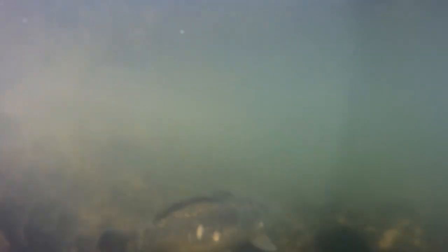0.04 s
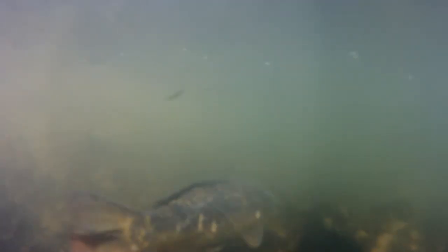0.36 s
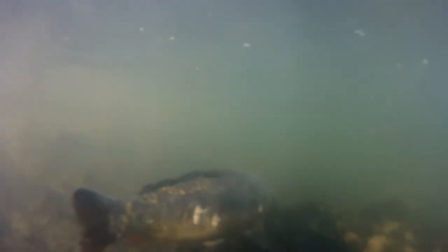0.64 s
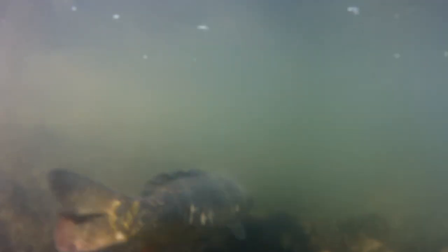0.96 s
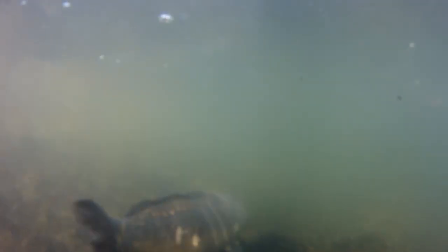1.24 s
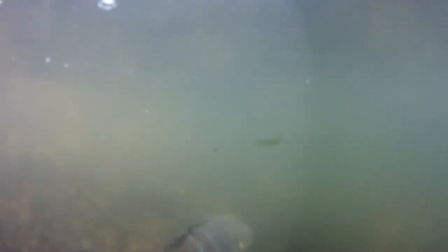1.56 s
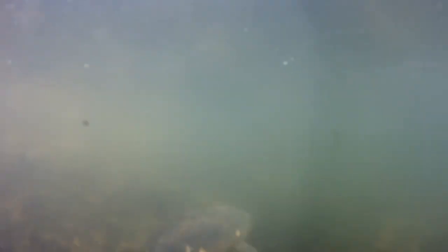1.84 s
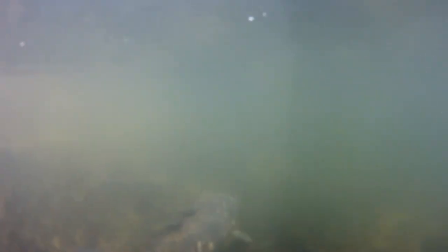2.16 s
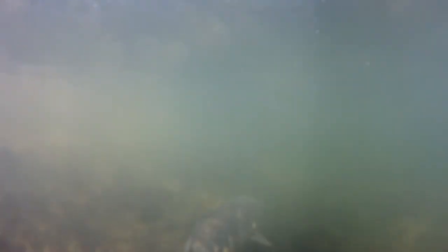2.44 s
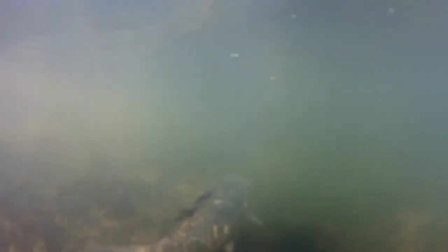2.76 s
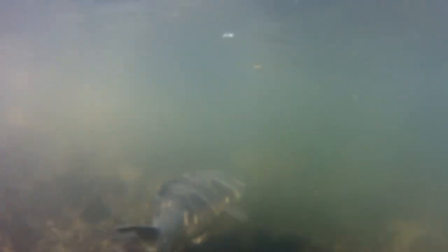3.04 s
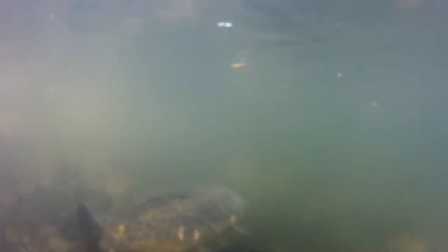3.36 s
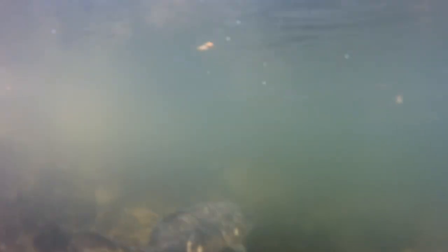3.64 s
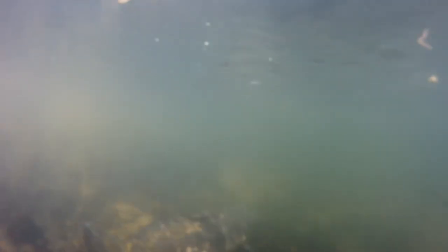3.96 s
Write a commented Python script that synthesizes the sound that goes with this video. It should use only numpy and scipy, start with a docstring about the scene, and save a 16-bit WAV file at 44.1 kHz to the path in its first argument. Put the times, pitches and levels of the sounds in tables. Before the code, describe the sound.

Muffled river water rumbles around a submerged camera, with handling bumps and little bubbles.

```python
"""A deep, swaying rumble of river water presses on a submerged camera in a waterproof housing,
under the steady hiss and thin whine of its electronics. The grip rubs and scuffs the housing,
which rings briefly, and gives it dull bumps. Bubbles pinch off nearby and ring as short plips,
grit ticks on the shell and tiny bubbles fizz. One hard, hollow knock stands out early on."""
import sys
import numpy as np
from scipy import signal
from scipy.fft import rfft, irfft
from scipy.io import wavfile

SR = 44100
rng = np.random.default_rng(int(sys.argv[2]) if len(sys.argv) > 2 else 0)


def master(y):
    """Save y as 16-bit WAV."""
    cut = np.clip(np.atleast_2d(y).T, -1, 1)
    pcm = np.round(cut * 32767)  # scale
    wavfile.write(sys.argv[1], SR, pcm.astype(np.int16))


N = 176400
TIME = np.arange(N) / SR
TREBLE_FROM_HZ = 1200  # divides the housing's low modes from its upper ones
HOUSING_PAN_DB = -3.5


def from_db(db):
    """Decibels to gain."""
    return 10 ** (np.asarray(db) / 20)


def unit_rms(x):
    """Scale to an rms of one."""
    return x / np.sqrt(np.mean(x ** 2) + 1e-20)


def fader(curve):
    """Gain over time from (t/s, level/dB) points."""
    return from_db(np.interp(TIME, *np.transpose(curve)))


def pan(db):
    """Left and right gains averaging one; db is left minus right."""
    gains = from_db([[db / 2], [-db / 2]])
    return gains / gains.mean()


def butterworth(x, order, hz, kind="low"):
    """Low-pass or band-pass with a smooth passband."""
    return signal.sosfilt(signal.butter(order, hz, kind, fs=SR, output="sos"), x + 1e-18)


def resonate(x, hz, width_hz):
    """One resonance with a gain of about one at its peak."""
    r = np.exp(-np.pi * width_hz / SR)
    return signal.lfilter([1 - r, 0, r - 1], [1, -2 * r * np.cos(2 * np.pi * hz / SR), r * r], x + 1e-18)


def noise(spectrum):
    """Unit-rms noise coloured by (f/Hz, level/dB) points, rolled off below the first."""
    hz, db = np.transpose(spectrum)
    f = np.maximum(np.arange(N // 2 + 1) * SR / N, 1e-3)
    gain = from_db(np.interp(np.log(f), np.log(hz), db)) * np.minimum(f / hz[0], 1) ** 2
    return unit_rms(irfft(rfft(rng.standard_normal(N)) * gain, N))


def stereo_noise(spectrum, side_db):
    """Centred noise, widened by a quieter side signal."""
    return noise(spectrum) + from_db(side_db) * noise(spectrum) * [[1], [-1]]


def clicks(per_s, spread_db):
    """Random clicks of uneven size."""
    sizes = from_db(spread_db * np.minimum(rng.exponential(1, N), 4)) * rng.choice([-1, 1], N)
    return sizes * (rng.random(N) < per_s / SR)


def add(out, start_s, sound):
    """Mix a sound in at its cue."""
    i = int(np.clip(start_s * SR, 0, N - 1))
    out[i:i + len(sound)] += sound[:N - i]


def water():
    """Swaying water: slow swells of pressure, and above them a rumble that comes in small surges."""
    # strength of the sway: t/s, level/dB
    sway = [(0,-36),(.4,-43.5),(.6,-47),(.85,-42.5),(1.2,-41.5),(1.6,-43.5),(1.8,-43),(2.1,-40.5),(2.45,-39.5),(2.7,-44),(3.1,-47),(3.4,-42.5),(3.65,-47.5),(4,-45)]
    # colours of the rumble and of the swells: f/Hz, level/dB
    rumble_colour = [(10,-6),(20,-5.5),(30,-4.5),(42,-11),(70,-16),(120,-21),(250,-32.5),(600,-38.5),(2000,-60)]
    swell_colour = [(7,-7),(14,-1.5),(28,-18.5),(120,-37),(2000,-100)]
    surge_db, surge_hz = 3, 7.7
    surges = from_db(surge_db * noise([(1, 0), (surge_hz, 0), (60, -40), (2000, -120)]))
    rumble = from_db(-7) * unit_rms(surges * stereo_noise(rumble_colour, side_db=-45))
    swells = from_db(-2.5) * noise(swell_colour)
    return fader(sway) * (pan(-10.5) * swells + pan(-4.5) * rumble)


def electronics():
    """The camera's circuits lay down a steady hiss and a thin whine."""
    # colour of the hiss: f/Hz, level/dB
    hiss_colour = [(100,14.5),(800,-10.5),(1200,3),(1900,0.5),(2500,1.5),(3000,1),(4000,1),(8000,1),(12000,1.5),(15000,1.5)]
    # tones of the whine: f/Hz, level/dB
    tones = [(6575,-79),(12200,-83),(13100,-80),(13150,-60),(13200,-79)]
    hiss = from_db(-60) * stereo_noise(hiss_colour, side_db=-11)
    whine = sum(np.sqrt(2) * from_db(db - 1) * np.sin(2 * np.pi * hz * TIME) for hz, db in tones)
    return pan(-1.5) * hiss + pan(HOUSING_PAN_DB) * whine


def housing(low_force, treble_force):
    """The shell rings: a softened force drives its low modes, a sharp one the upper."""
    # resonances of the housing: f/Hz, width/Hz, level/dB
    modes = [(230,97,-7),(461,237,-2),(643,224,1.5),(772.6,91,6),(1432,97,-5.5),(1890,258,-0.5),(2946,220,2),(4180,140,-15),(4900,300,-19.5)]
    soft_force = butterworth(low_force, 4, hz=926)
    out = 0
    for hz, width, db in modes:
        ring = resonate(treble_force if hz > TREBLE_FROM_HZ else soft_force, hz, width)
        out += from_db(db) * resonate(ring, hz, 2.5 * width)  # darkens the valleys between modes
    return out


def rubbing():
    """The shifting grip: dense slips ring the housing, and sparser soft thuds press on it."""
    # how hard the grip rubs: t/s, level/dB
    effort = [(0,-57),(.03,-69),(.05,-46),(.21,-47),(.275,-55),(.295,-47),(.46,-46),(.51,-56.5),(.68,-52.5),(1.04,-63),(1.12,-61),(1.33,-63.5),(1.39,-44.5),(1.47,-61.5),(1.62,-55),(1.78,-54),(1.86,-67.5),(1.95,-49),(2.02,-61.5),(2.39,-66.5),(2.42,-49),(2.49,-58),(2.55,-50),(2.64,-62.5),(2.79,-57),(2.95,-62.5),(3.6,-64),(3.81,-53),(3.89,-57.5),(3.91,-47.5),(3.97,-40),(4,-36.5)]
    treble_db, thud_low_hz, thud_top_hz = -6.5, 82.4, 502
    slips = clicks(per_s=900, spread_db=4.5)
    ringing = unit_rms(housing(slips, slips * from_db(treble_db)))
    presses = butterworth(clicks(per_s=300, spread_db=4.5), 5, thud_top_hz)
    thuds = unit_rms(butterworth(presses, 1, [thud_low_hz, thud_top_hz], "band"))
    return fader(effort) * (from_db(-7) * ringing + from_db(-4) * thuds)


def bumps():
    """Dull, heavily damped pushes on the housing, each one swing of pressure down and up."""
    # soft contacts of the grip: t/s, level/dB, f/Hz
    contacts = [(.036,-36.5,215),(.056,-28.5,324),(0.106,-34.5,186),(0.1139,-25.5,335),(0.127,-43,69),(0.1604,-32.5,400),(0.174,-46,130),(0.188,-36,149),(0.215,-37.5,80),(0.267,-39.5,75),(0.2024,-47,220),(0.2081,-40,220),(0.2864,-27.5,280),(.292,-36,333),(0.304,-38,430),(0.334,-36,220),(0.373,-42,192),(0.4038,-44,300),(.4665,-39,344),(0.5403,-39.5,230),(0.703,-42,230),(0.707,-44,257),(.9355,-44,296),(1.0268,-41.5,278),(1.204,-49,300),(1.352,-39,237),(1.374,-32,236),(1.3811,-36,230),(1.3975,-41,262),(1.426,-41,260),(1.6537,-43.5,250),(1.7196,-41,257),(1.7517,-41,253),(1.7921,-39.5,252),(1.936,-39,85.5),(1.947,-51,125),(2.4187,-40.5,158),(2.4251,-33,200),(2.4322,-37,140),(2.5224,-35,230),(2.771,-39.5,326),(3.6906,-37.5,334),(3.967,-32,380),(3.984,-28.5,300)]
    out, t = np.zeros(N), TIME[:SR // 25] - 1 / 50  # 40 ms centred on the contact
    for s, db, hz in contacts:
        phase = 2 * np.pi * hz * t
        push = phase * np.exp((1 - phase ** 2) / 2)
        add(out, s + t[0], from_db(db) * push)
    return out


def bubbles():
    """Each bubble pinches off with a tiny splash, then rings as a dying sine that rises in pitch."""
    # single bubbles: t/s, f/Hz, level/dB, t60/s
    plips = [(.041,770,-31.5,0.064),(.0745,730,-34.5,0.045),(0.3792,2870,-36,0.019),(.424,4740,-41.5,.015),(0.425,8160,-49,0.0066),(.256,770,-39,0.025),(.298,820,-40,0.095),(0.521,2240,-49.5,0.039),(.631,752,-43.5,0.19),(.636,1730,-45,.07),(0.649,1762,-45,0.055),(0.715,1465,-48,0.074),(.723,3054,-29.5,0.024),(0.736,5200,-42,0.017),(.833,4370,-39.5,0.018),(.834,4900,-42,0.0085),(0.8524,3980,-30.5,0.015),(0.8834,3000,-36.5,0.019),(.955,7250,-45.5,0.011),(0.9547,4800,-47.5,.012),(1.169,745,-35,0.049),(1.191,5420,-44,.018),(1.193,1890,-52,0.057),(1.197,3040,-47,0.032),(1.245,4740,-40,0.011),(1.272,2970,-41.5,0.021),(1.285,3140,-50,0.048),(1.30,770,-51.5,0.14),(1.34,2500,-48,0.042),(1.9445,2990,-26,0.018),(2.058,2080,-45,0.019),(2.223,2040,-46,.02),(2.286,3020,-48,0.026),(2.404,4900,-46,.012),(3.031,2950,-35.5,0.0093),(3.108,5130,-39,0.01),(3.139,983,-46,0.045),(3.168,2800,-45,0.024),(3.171,3760,-42.5,0.02),(3.177,4500,-45,0.013),(3.325,2250,-51,0.051),(3.395,2170,-52,0.046),(3.428,3200,-50.5,0.036),(3.457,1864,-44,0.031),(3.468,2900,-48.5,0.035),(3.511,4600,-48.5,.02),(3.523,3100,-44.5,0.03),(3.557,2890,-45.5,.025),(3.583,940,-38,0.048),(3.733,4030,-41.5,0.015),(3.899,693,-30.5,0.034),(3.931,680,-35.5,0.062)]
    attack_cycles, rise_per_s = 3.25, 1.1
    splash_db, splash_s = -15.5, 0.0017
    out, t = np.zeros(N), TIME[:SR // 10]
    splash_envelope = t / splash_s * np.exp(1 - t / splash_s) / 2
    for s, hz, db, t60 in plips:
        attack = 1 - np.exp(-(t * hz / attack_cycles) ** 2)
        phase = 2 * np.pi * hz * (t + rise_per_s * t * t / 2)
        ring = attack * from_db(-60 * t / t60) * np.sin(phase)
        splash = splash_envelope * unit_rms(resonate(rng.standard_normal(len(t)), hz, hz / 2))
        add(out, s, from_db(db + 1) * (ring + from_db(splash_db) * splash))
    return out


def scuffs():
    """Tiny slips swell and fade within milliseconds around one firm catch, and ring the housing."""
    # short scuffs of the grip: t/s, level/dB, half length/s, treble/dB
    strokes = [(0.0577,-36,0.001,1),(0.1151,-35,.0025,1),(0.157,-51,0.0085,6.5),(0.1622,-40,0.0019,4.5),(0.186,-54.5,0.0046,6),(.2055,-43,0.0015,-3),(0.281,-61,.005,14),(0.2852,-33,.0015,-2),(0.2926,-37,0.0019,-4),(0.332,-39.5,0.0014,-3.5),(0.413,-43,0.0024,-4.5),(.4365,-42,0.0039,-7),(0.7,-43.5,0.0012,3),(.709,-49,0.0018,7),(.715,-45,0.0022,0),(0.937,-43.5,0.0011,-9),(1.204,-47,0.0015,-12),(1.76,-57,0.0054,2.5),(1.784,-60,0.0052,5),(1.869,-58.5,.001,16.5),(1.893,-64.5,0.0028,17.5),(1.944,-39,0.0032,-5.5),(2.773,-44.5,.002,0.5),(3.91,-57,.002,-2),(3.953,-45,0.0044,-8),(3.966,-46,0.0035,-11),(3.971,-50.5,0.0036,-1),(3.982,-44.5,0.0039,-4.5),(3.997,-46,0.0019,3)]
    grain_db, catch_db = -2, -1.5
    grain = rng.choice([-1., 1.], N)
    low_force, treble_force = np.zeros(N), np.zeros(N)
    for s, db, half_s, treble_db in strokes:
        envelope = np.exp(-np.minimum(((TIME - s) / half_s) ** 2, 50))
        force = from_db(grain_db) * grain * envelope
        catch = from_db(catch_db) * np.sqrt(half_s * SR)
        add(force, s - half_s / 2, [catch])
        low_force += from_db(db) * force
        treble_force += from_db(db + treble_db) * force
    return housing(low_force, treble_force) / np.std(housing(grain, grain))


def ticks():
    """Grit strikes the housing in faint, thin cracks of noise."""
    # hits of grit: t/s, level/dB
    hits = [(0.116,-36),(0.16,-48),(.2862,-37),(0.33,-43.5),(0.4238,-34.5),(0.703,-43),(1.944,-41),(2.063,-44),(2.451,-46.5)]
    rise_s, band_hz = 0.0018, [3500, 14700]
    out, t = np.zeros(N), TIME[:SR // 20]
    envelope = t / rise_s * np.exp(1 - t / rise_s) / 2
    for s, db in hits:
        add(out, s - rise_s, from_db(db) * envelope * rng.standard_normal(len(t)))
    return butterworth(out, 1, band_hz, "band")


def fizz():
    """Many tiny bubbles ring at random moments and pitches."""
    # strength of the fizz: t/s, level/dB
    strength = [(0,-75),(.3,-76),(.43,-53.5),(.5,-68),(.72,-67),(.8,-66.5),(1.15,-64),(1.27,-58),(1.4,-63),(1.5,-77),(1.85,-63.5),(2.6,-72),(2.98,-69),(3.15,-60),(3.3,-66.5),(3.5,-65.5),(3.65,-73),(4,-65.5)]
    # colour of the fizz: f/Hz, level/dB
    colour = [(700,-7.5),(1100,-7),(1750,-0.5),(2500,1),(3100,4),(4000,-3.5),(5500,1)]
    pitches_hz, t60_cycles = np.geomspace(700, 5600, 36), 80
    births = clicks(per_s=800, spread_db=5)
    pitch_index = rng.integers(0, len(pitches_hz), N)
    out = 0
    for k, hz in enumerate(pitches_hz):
        width = np.log(1000) / np.pi * hz / t60_cycles
        gain = from_db(np.interp(hz, *np.transpose(colour))) / width
        out += gain * resonate(births * (pitch_index == k), hz, width)
    return fader(strength) * unit_rms(out)


def knock():
    """One hard tap on the housing, with a short, hollow ring."""
    # modes the tap excites: f/Hz, level/dB, t60/s
    modes = [(673,-28.5,0.028),(745,-59,.022),(1280,-60,0.024),(1730,-54,0.019),(1920,-23,0.029),(2170,-31.5,0.022)]
    start_s = .6043
    out, t = np.zeros(N), TIME[:SR // 10]
    for hz, db, t60 in modes:
        polarity = -1 if hz < TREBLE_FROM_HZ else 1
        add(out, start_s, polarity * from_db(db - 60 * t / t60) * np.sin(2 * np.pi * hz * t))
    return butterworth(out, 4, hz=2700)


def scene():
    """Close handling and bubbles over a bed of water and electronics, all leaning to the right."""
    near = bumps() + scuffs() + rubbing() + knock() + ticks() + bubbles() + fizz()
    return water() + pan(HOUSING_PAN_DB) * near + electronics()


def record(dry):
    """A steep low-pass shaves off the highest treble."""
    cutoff_hz = 15350
    return signal.sosfilt(signal.ellip(12, .1, 80, cutoff_hz, fs=SR, output="sos"), dry)


dry = scene()
out = record(dry)
master(out)
```